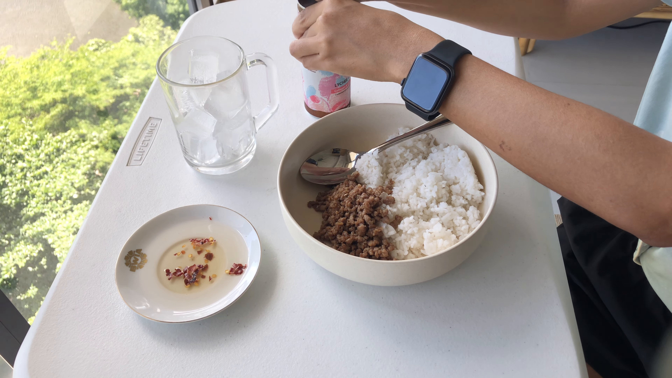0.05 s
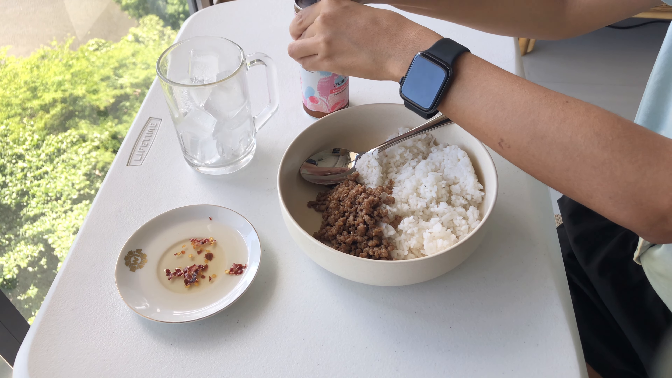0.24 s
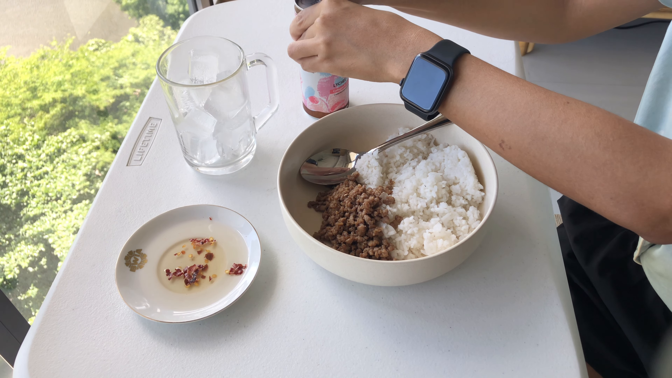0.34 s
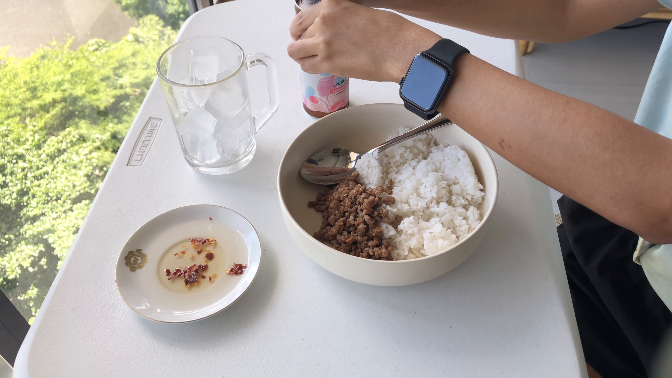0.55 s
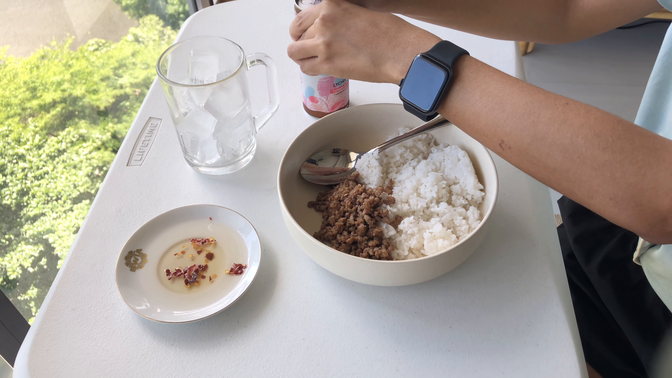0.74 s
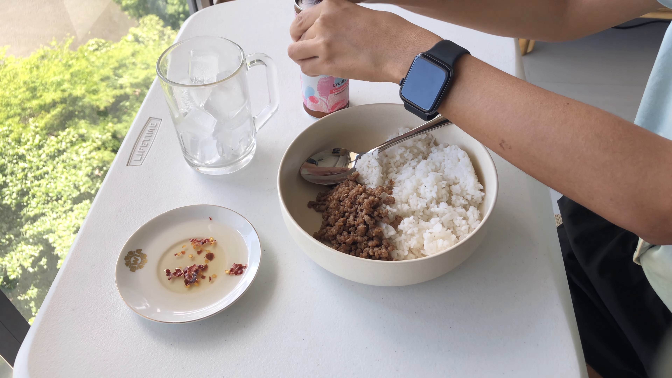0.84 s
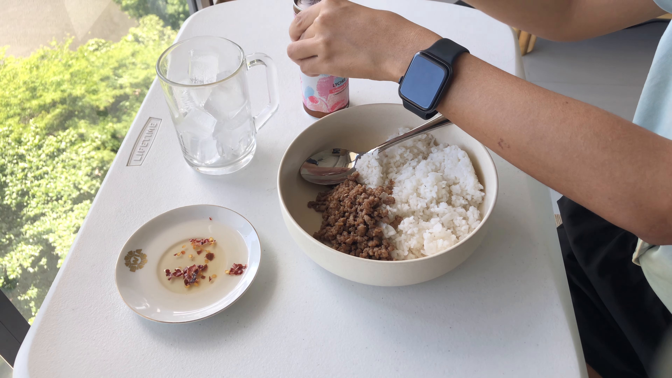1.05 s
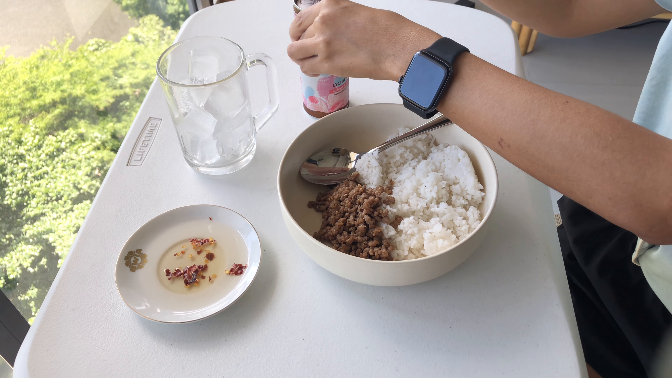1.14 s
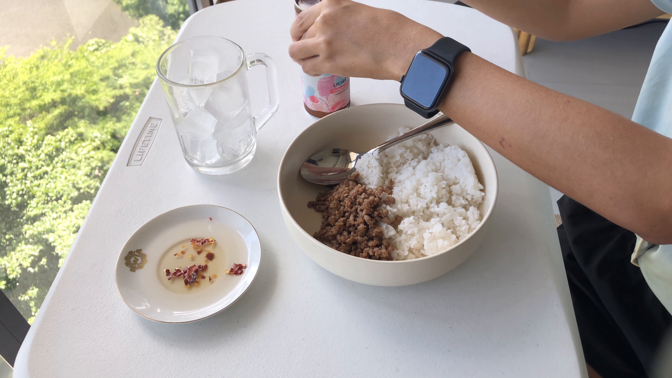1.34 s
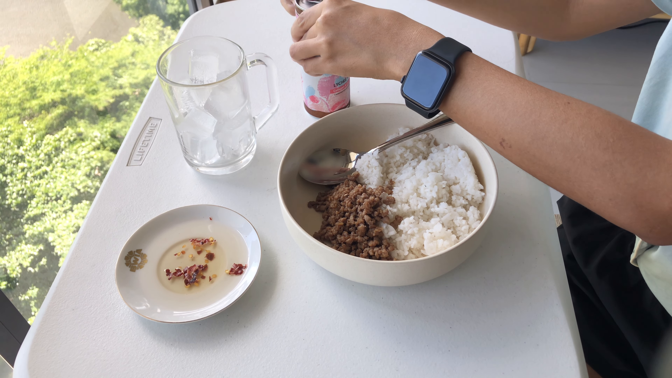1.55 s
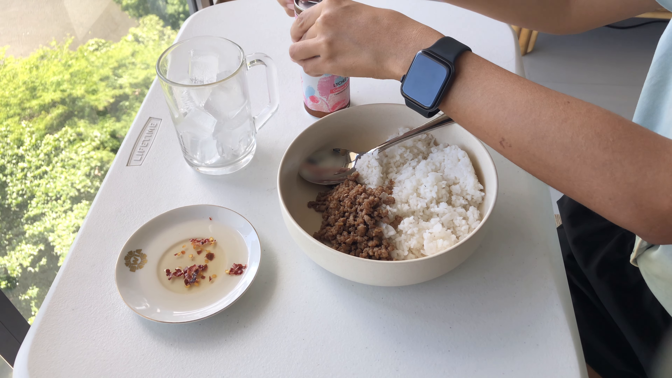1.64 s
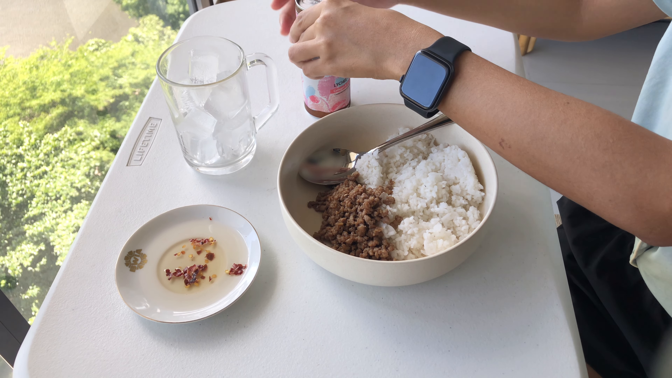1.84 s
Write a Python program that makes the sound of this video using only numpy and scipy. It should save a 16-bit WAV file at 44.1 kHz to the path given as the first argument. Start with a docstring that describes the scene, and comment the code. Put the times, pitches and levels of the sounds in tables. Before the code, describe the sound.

A drink can cracks open with a brief hiss, and its metal tab clicks back.

```python
"""A faint breath of gas and sharp ticks sound over a low appliance hum as a drink can's tab is lifted.
The seal bursts with a pop and a hiss, the flap creaks down and snaps in, and the tab clicks back.
Each impulse excites damped normal modes of the aluminium can; the gas is a filtered pulse and noise.
The quiet, hard-walled room prolongs these sounds by reverberation. Both channels are the same."""
import sys
import numpy as np
from scipy import signal
from scipy.fft import rfft, irfft
from scipy.io import wavfile
from scipy.ndimage import uniform_filter1d

SR = 44100
rng = np.random.default_rng(int(sys.argv[2]) if len(sys.argv) > 2 else 0)


def unload_wav(signal):
    """Save mono or channel-first audio to the path in sys.argv[1] as 16-bit WAV at rate SR, clipped to [-1, 1]."""
    wavfile.write(
        sys.argv[1],
        SR,
        np.round(np.clip(np.atleast_2d(signal).T, -1, 1) * 32767).astype(np.int16),
    )


N = 83790
LEAD_S = .1  # sound may begin this long before time zero
T = np.arange(N + int(LEAD_S * SR)) / SR

# Room rumble spectrum: frequency_hz, relative_db
RUMBLE_SPECTRUM = [(15, -51.5), (25, -15.5), (35, -14.5), (48, -7.5), (140, -4.5), (169, -2), (188, -14.5),
                   (209, -15), (267, -22), (340, -19), (421, -19), (457, -26), (648, -27.5), (703, -33),
                   (848, -27.5), (997, -36), (1270, -34.5), (1380, -35.5), (1800, -36.5), (2630, -41.5),
                   (15500, -49)]
# Appliance hum partials: pitch_hz, start_db, middle_db, end_db
HUM_PARTIALS = [(61.8, -62, -67, -58.5), (119.4, -47, -57, -69), (175, -49, -60, -61.5)]

# Impulses on the can: start_s, level_db, tilt_db_per_octave
SEAL_TEARS = [(-.03, -23.5, 3.5), (0.219, -2, 0)]  # the seal gives a little, then tears open
LID_TICKS = [(.0645, -43, -16), (.0762, -35, -2), (.0989, -19.5, 2.5), (.1318, -34.5, -6),
             (.1443, -35, -13.5), (.1588, -38.5, 3), (.2022, -32, -4), (.2087, -14.5, 1.5), (.2179, -13, 3),
             (1.0101, -55, 10), (1.3355, -48, 9), (1.5818, -52.5, -8)]
FLAP_CREAKS = [(.8359, -42, -1), (.8639, -41, 3.5), (.8760, -36.5, 2.5)]
FLAP_PUSHES = [(.8645, -43, 5)]  # the bending flap sets the can ringing
FLAP_SNAPS = [(1.0555, -23.5, 4)]
CAN_KNOCKS = [(1.2748, -47, -5), (1.3932, -46, -3), (1.5820, -53.5, 5), (1.6660, -57, 0)]
TAB_CLICKS = [(1.3074, -23.5, 5)]

# Normal modes: pitch_hz, relative_db, t60_s
BURST_MODES = [(450, -15, .012), (720, -11.5, .014), (1350, -9.5, 0.0086), (1610, -0.5, 0.018),
               (1950, -3.5, .01), (2300, -1, .011), (3900, 3.5, .014), (4380, -1.5, .014), (4950, -5, .014),
               (5700, -1, .012), (6450, -1, .014), (7850, -0.5, .012), (9830, 0, .012), (10520, -1.5, .012),
               (12120, 1, .012), (13800, -7.5, .01)]
SHELL_MODES = [(801.7, -3, .3), (1626, -16.5, 1), (1820, -7.5, .5), (2605, -9.5, .5), (4022, -1.5, .5),
               (4147, -2, .55), (4453, -14.5, 1), (4608, -2, .5), (4735, -2, 0.16), (5911, -1, .4),
               (6230, -15.5, 0.99), (6290, -3, .5), (7835, 6.5, .35), (9640, 3.5, 0.23)]  # long ring of the can after the pop
CLOSED_LID_MODES = [(820, -28.5, 0.004), (1630, -17, 0.017), (2900, -12.5, 0.027), (3960, -5.5, 0.016),
                    (5600, -5.5, .014), (6600, -3, .012), (7250, -1, 0.014), (7600, -4.5, .014),
                    (8640, -4, 0.019), (9765, -2.5, .014), (11970, -4.5, 0.011), (14900, -9.5, .014),
                    (14700, -9.5, .01)]
FLAP_MODES = [(1085, 3, 0.035), (1243, -1, 0.041), (1490, -1.5, .016), (2205, -5, 0.053), (2570, -5, .012),
              (3390, -5, 0.019), (3960, -12.5, 0.019), (5400, -15.5, 0.02), (6570, -8, 0.0071),
              (6970, -11, 0.016), (8800, -17.5, 0.013), (9800, -20.5, 0.012), (14400, -26, .007)]  # the flap and the air under it
CAN_MODES = [(1083, -5, 0.18), (1170, -5, 0.16), (1215, -0.5, 0.059)]
SNAP_MODES = [(3020, 1, 0.013), (3800, 0.5, 0.0064), (6600, -15, .007), (6750, -16, 0.018),
              (10000, -11, 0.0068), (11960, -6.5, .004)]
HOLLOW_MODES = [(1250, -3, 0.048), (1370, 1.5, 0.032), (1510, -7, 0.035)]
OPEN_LID_MODES = [(1345, 1, 0.022), (2180, -8, 0.022), (2720, -9, 0.036), (3270, -9, 0.043),
                  (3880, 7.5, 0.0091), (4210, -7.5, 0.069), (4730, -11, 0.0096), (5320, -10, 0.02),
                  (7240, -14, 0.038), (7800, -14, 0.02), (8500, -13, 0.012), (9300, -14, 0.02),
                  (11800, -24, .012)]

# Spectra of the escaping gas: frequency_hz, relative_db
PUFF_SPECTRUM = [(88, -35), (150, -7.5), (225, -23), (359, -8.5), (445, -8), (500, -17), (781, -3),
                 (1000, -13.5), (1910, -3.5), (2140, -12), (2500, -7), (2980, -23), (3280, -8),
                 (3760, -13.5), (4480, 0.5), (5440, -7), (5870, -2.5), (7710, -7), (8830, -12.5),
                 (9540, -6), (10700, -10), (14300, -14.5), (15500, -17.5)]
HISS_SPECTRUM = [(290, -42), (500, -16.5), (769, -10.5), (1430, -10.5), (1800, -5), (2970, -19),
                 (3280, -2.5), (3850, -11), (4570, -7.5), (6000, -7), (8720, -18.5), (9790, -14),
                 (15500, -30.5)]
# Spectra radiated toward the walls: frequency_hz, relative_db
SNAP_WALL_SPECTRUM = [(180, -21), (300, -11), (348, 3.5), (366, -32), (446, -7), (652, -14), (835, -5),
                      (1140, -12.5), (1330, -4), (1870, -6.5), (4280, -1), (6250, -4.5), (8010, -10),
                      (11100, -8.5), (15500, -15.5)]
CLICK_WALL_SPECTRUM = [(530, -52), (900, -9), (1000, -22), (1240, 2), (1560, -16.5), (2510, -5.5),
                       (3030, -11), (3260, 3), (3580, -2.5), (4330, 7), (6050, -15), (7500, -6), (9070, -4),
                       (10100, -15), (15500, -24)]
# Reverberation time by band: centre_hz, t60_s
ROOM_T60 = [(200, 0.73), (600, 0.55), (1500, 0.61), (4500, 0.54), (7500, .44), (10000, 0.38), (15000, 0.37)]


def amp(db):
    """Amplitude grows tenfold every 20 decibels."""
    return 10 ** (np.asarray(db) / 20)


def unit_rms(x):
    """Normalisation to unit mean power."""
    return x / np.sqrt(np.mean(x ** 2))


def curve_at(points, hz):
    """Interpolation of (frequency, value) points on a logarithmic frequency axis."""
    points = np.array(points)
    return np.interp(np.log(hz + 1e-6), np.log(points[:, 0]), points[:, 1])


def tilt(hz, db_per_octave):
    """Spectral slope: the level change in decibels about a 5 kHz pivot."""
    return db_per_octave * np.log2(hz / 5000)


def colour(x, spectrum):
    """Minimum-phase filtering imposes a spectrum with a causal response of unit energy."""
    size = 2 * len(T)
    gain = unit_rms(amp(curve_at(spectrum, np.fft.rfftfreq(size, 1 / SR))))
    cepstrum = irfft(np.log(gain))
    cepstrum[1:size // 2] *= 2
    cepstrum[size // 2 + 1:] = 0
    return irfft(rfft(x, size) * np.exp(rfft(cepstrum)))[:len(T)]


def place(start_s, x):
    """A pure delay sets a sound at its start time."""
    silence = np.zeros(max(int((start_s + LEAD_S) * SR), 0))
    return np.concatenate([silence, x, np.zeros(len(T))])[:len(T)]


def noise():
    """White noise has equal mean power at all frequencies."""
    return rng.standard_normal(len(T))


def drift(rate_hz):
    """A moving average turns random steps into a slow fluctuation of spread near 1."""
    hold = int(SR / rate_hz)
    steps = np.repeat(rng.standard_normal(len(T) // hold + 1), hold)
    return 1.5 * uniform_filter1d(steps, 2 * hold)[:len(T)]


def strike(impulses, modes, crack_db, crack_s, attack_s, wall_ring_db=-np.inf, wall_crack_db=-np.inf):
    """Modal superposition: impulses excite damped sines and a noise crack. Gives (direct, to walls)."""
    hz, mode_db, t60 = np.array(modes).T[:, :, None]
    t = T[:SR * 3 // 4]
    bins_hz = np.fft.rfftfreq(len(t), 1 / SR) + 1
    passband = 1 / np.sqrt((1 + (hz.min() / bins_hz) ** 6) * (1 + (bins_hz / hz.max()) ** 6))
    decay = np.exp(-np.log(1000) * t / t60)
    direct = to_walls = 0
    for start_s, level_db, slope in impulses:
        gain = amp(mode_db + tilt(hz, slope))
        phase = 2 * np.pi * (hz * t + rng.random(hz.shape))
        ring = (gain * np.sin(phase) * decay).sum(0) / np.sqrt((gain ** 2).sum() / 2)
        outline = passband * np.interp(bins_hz, hz[:, 0], gain[:, 0])
        band_noise = irfft(rfft(rng.standard_normal(len(t))) * outline, len(t))
        crack = unit_rms(band_noise) * np.exp(-t / crack_s)
        onset = amp(level_db) * (1 - np.exp(-t / attack_s))
        direct += place(start_s, onset * (ring + amp(crack_db) * crack))
        to_walls += place(start_s, onset * (amp(wall_ring_db) * ring + amp(wall_crack_db) * crack))
    return np.array([direct, to_walls])


def wall_pulse(start_s, spectrum, level_db):
    """Directivity: a pulse radiated away from the listener reaches only the walls."""
    return np.array([np.zeros(len(T)), amp(level_db) * colour(place(start_s, [1.]), spectrum)])


def room_rumble():
    """Stationary noise with its power concentrated in the bass."""
    return amp(-51.9) * colour(noise(), RUMBLE_SPECTRUM)


def appliance_hum():
    """Slow amplitude and frequency modulation makes three low partials waver."""
    hum = 0
    for hz, *levels_db in HUM_PARTIALS:
        level_db = np.interp(T, np.linspace(0, T[-1], len(levels_db)), levels_db) + 1.2 * drift(3)
        pitch_hz = hz * (1 + 0.0066 * drift(7))
        hum += np.sqrt(2) * amp(level_db) * np.sin(2 * np.pi * np.cumsum(pitch_hz) / SR)
    return hum


def escaping_gas():
    """Pressure release: each tear emits a puff, which excites the room, and a decaying hiss."""
    hiss_decay_s = 0.095
    direct = to_walls = 0
    for start_s, level_db, slope in SEAL_TEARS:
        spectrum = [(hz, db + tilt(hz, slope)) for hz, db in PUFF_SPECTRUM]
        puff = colour(place(start_s, [1.]), spectrum)
        hiss = colour(place(start_s, noise() * np.exp(-T / hiss_decay_s)), HISS_SPECTRUM)
        direct += amp(level_db) * (amp(5) * puff + amp(-25.5) * hiss)
        to_walls += amp(level_db + 18.5) * puff
    return np.array([direct, to_walls])


def bursting_seal():
    """Rupture excites heavily damped lid modes, the pop, and lightly damped shell modes, the ring."""
    pop = strike(SEAL_TEARS, BURST_MODES, crack_db=-10.5, crack_s=.0012, attack_s=.00023)
    ring = strike(SEAL_TEARS, SHELL_MODES, crack_db=-28.5, crack_s=.003, attack_s=.016)
    return amp(1.5) * pop + amp(-22.5) * ring


def ticking_lid():
    """Strain under the tab is released in impulses that briefly excite the lid's modes."""
    return strike(LID_TICKS, CLOSED_LID_MODES, crack_db=-5, crack_s=.0027, attack_s=.0001,
                  wall_ring_db=-5, wall_crack_db=-6)


def creaking_flap():
    """Mechanical coupling: the flap bends in three creaks and sets the can ringing."""
    creaks = strike(FLAP_CREAKS, FLAP_MODES, crack_db=-1, crack_s=.003, attack_s=.0001,
                    wall_ring_db=-6, wall_crack_db=-2.5)
    ring = strike(FLAP_PUSHES, CAN_MODES, crack_db=-20, crack_s=.002, attack_s=.006,
                  wall_ring_db=3.5, wall_crack_db=-20)
    return creaks + ring


def snapping_flap():
    """The flap snaps in, and the abrupt impulse excites high, quickly damped modes."""
    snap = strike(FLAP_SNAPS, SNAP_MODES, crack_db=-22, crack_s=.00086, attack_s=.00021)
    return snap + wall_pulse(FLAP_SNAPS[0][0], SNAP_WALL_SPECTRUM, level_db=-6)


def knocking_can():
    """Resonance of the hollow can gives soft knocks their pitch."""
    return strike(CAN_KNOCKS, HOLLOW_MODES, crack_db=-2.5, crack_s=.0032, attack_s=.00099,
                  wall_ring_db=-20, wall_crack_db=-3.5)


def clicking_tab():
    """Elastic recoil: the tab springs back and excites the modes of the open lid."""
    click = strike(TAB_CLICKS, OPEN_LID_MODES, crack_db=-14, crack_s=.003, attack_s=.00013)
    return click + wall_pulse(TAB_CLICKS[0][0], CLICK_WALL_SPECTRUM, level_db=-13)


def reverberation(x):
    """Convolution with weak table scatter, strong wall echoes and a tail whose treble dies first."""
    first_echo_s, early_decay_s = 0.014, 0.015
    scatter_db, early_db = -2, 3
    hz = np.fft.rfftfreq(len(T), 1 / SR)
    noise_spectrum = rfft(noise())
    response = 0
    for band_hz, t60 in ROOM_T60:
        band = curve_at([(centre_hz, float(centre_hz == band_hz)) for centre_hz, _ in ROOM_T60], hz)
        response += irfft(noise_spectrum * band, len(T)) * np.exp(-np.log(1000) * T / t60)
    early_gain = 1 + (amp(early_db) - 1) * np.exp(-np.abs(T - first_echo_s) / early_decay_s)
    response *= np.where(T < first_echo_s, amp(scatter_db), early_gain)
    return signal.fftconvolve(x, response / np.sqrt(np.sum(response ** 2)))[:len(T)]


def scene():
    """Superposition of the background, the direct sound and the reverberant field."""
    opening = ticking_lid() + bursting_seal() + escaping_gas()
    direct, to_walls = opening + creaking_flap() + snapping_flap() + clicking_tab() + knocking_can()
    mono = (direct + reverberation(to_walls) + appliance_hum() + room_rumble())[-N:]
    return np.array([mono, mono])


def record(dry):
    """Band limiting and saturation: the deepest bass is cut, the pop clips, and the top is cut."""
    low_cut_hz, high_cut_hz = 42, 15650
    highpass = signal.butter(4, low_cut_hz, "high", fs=SR, output="sos")
    lowpass = signal.ellip(10, .2, 70, high_cut_hz, fs=SR, output="sos")
    clipped = np.clip(signal.sosfilt(highpass, dry), -1, 1)
    return signal.sosfilt(lowpass, clipped)


dry = scene()
out = record(dry)
unload_wav(out)
```